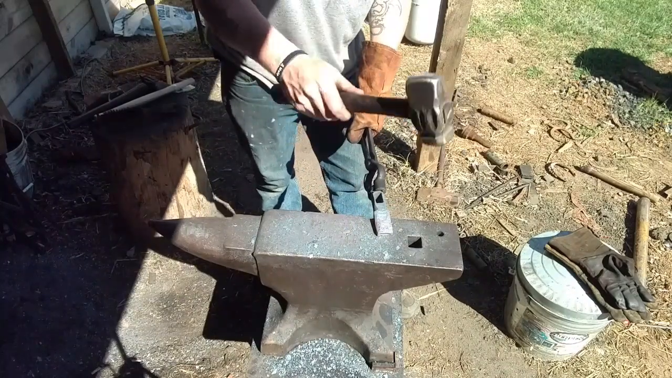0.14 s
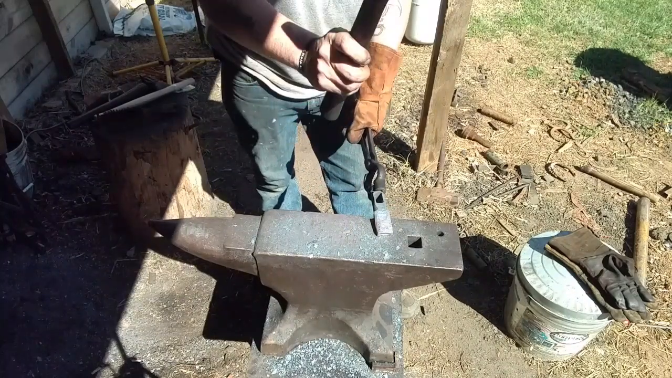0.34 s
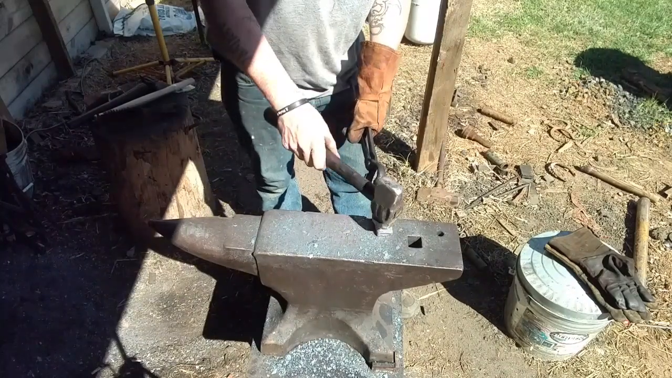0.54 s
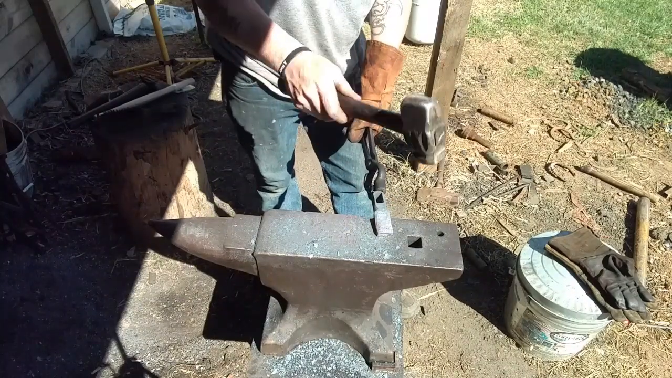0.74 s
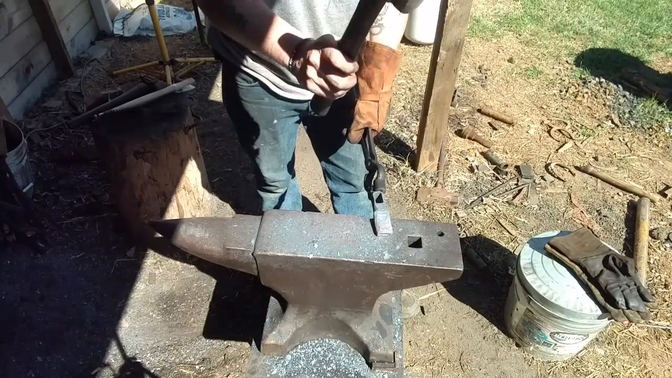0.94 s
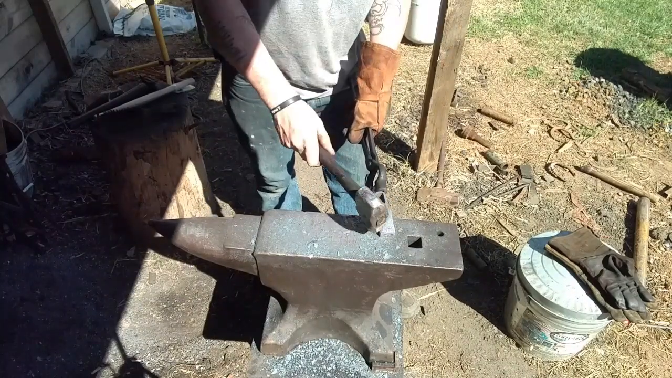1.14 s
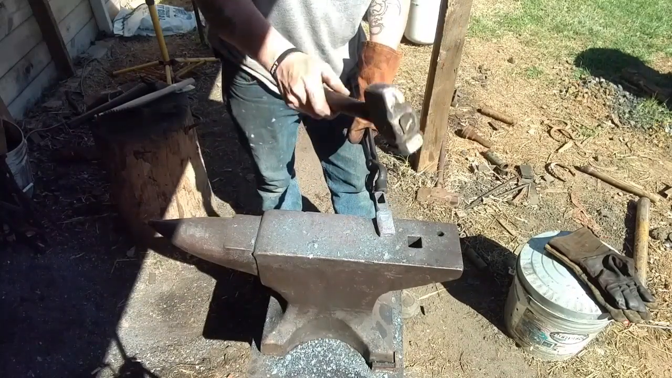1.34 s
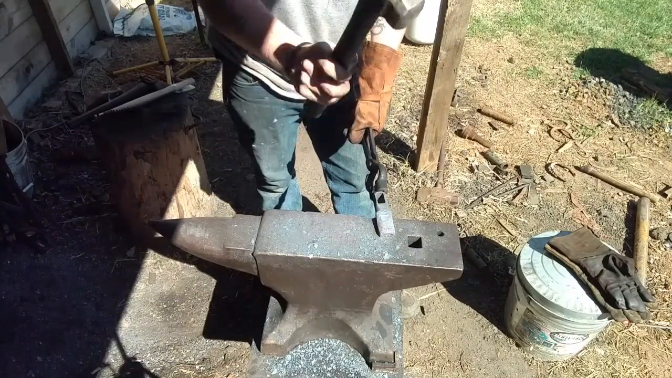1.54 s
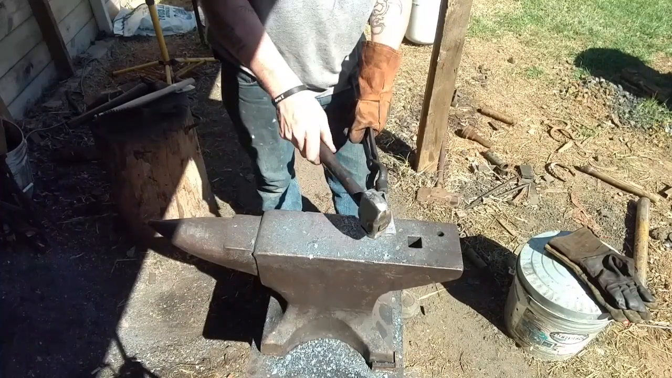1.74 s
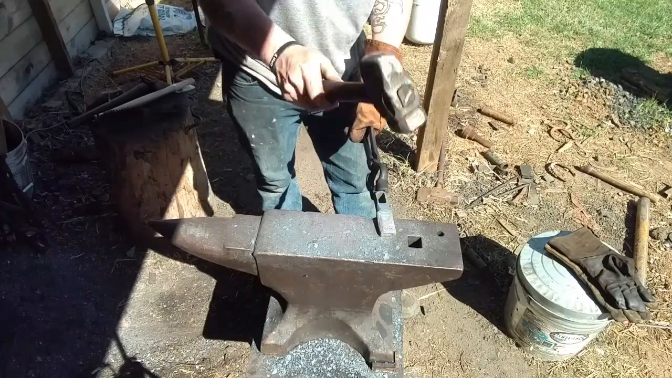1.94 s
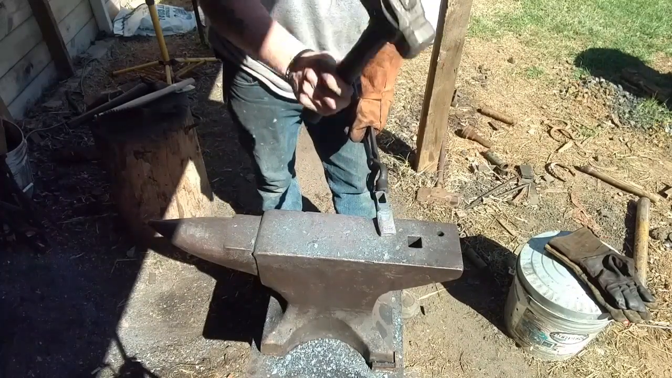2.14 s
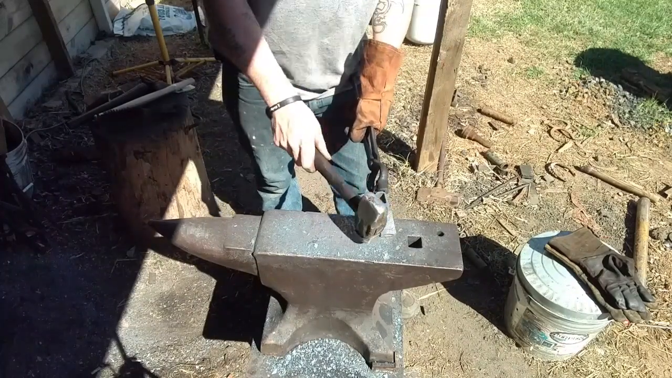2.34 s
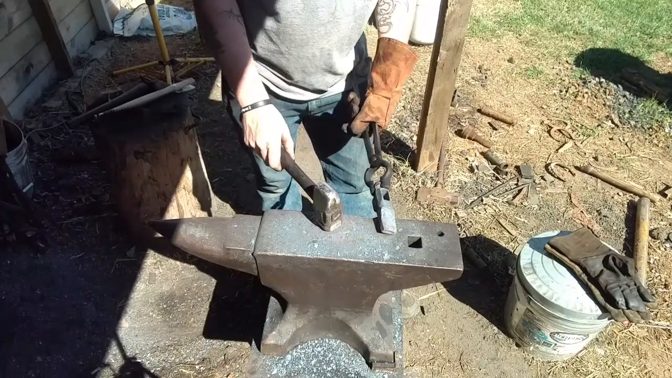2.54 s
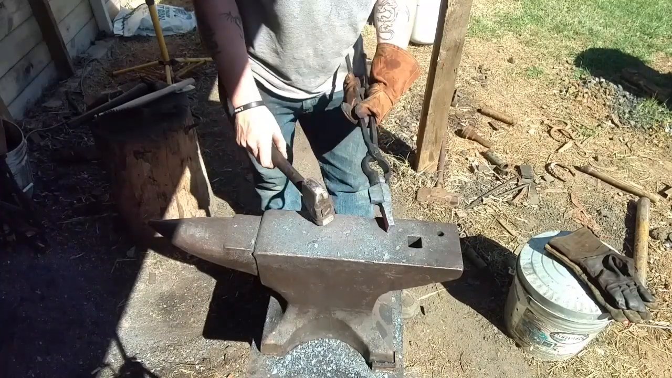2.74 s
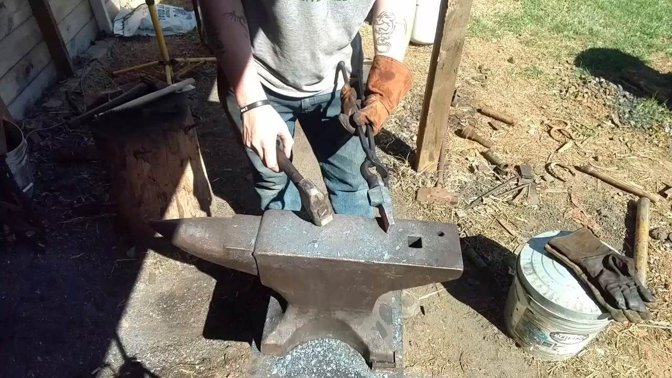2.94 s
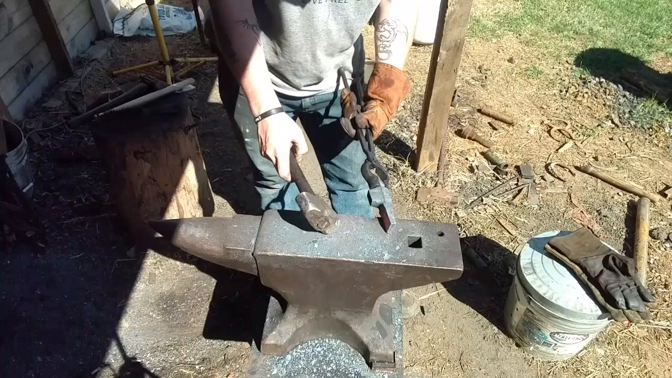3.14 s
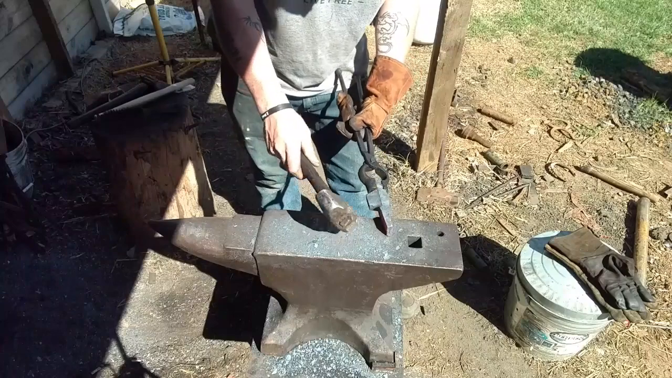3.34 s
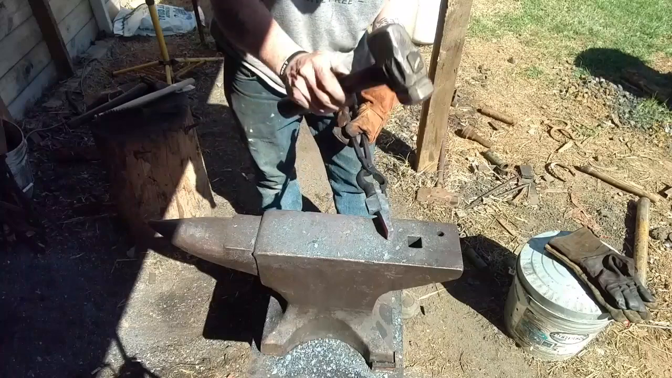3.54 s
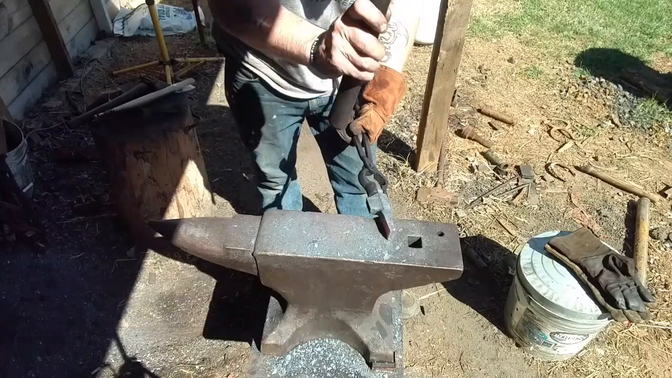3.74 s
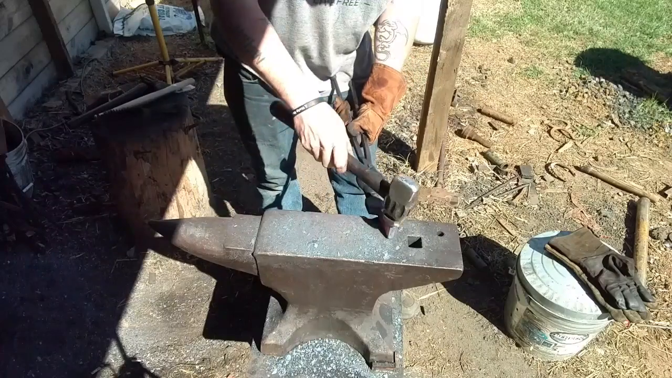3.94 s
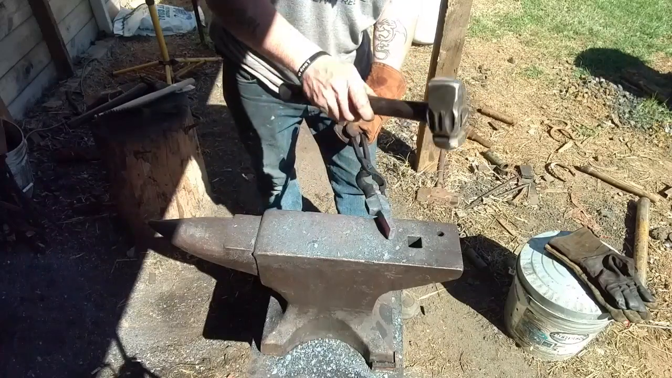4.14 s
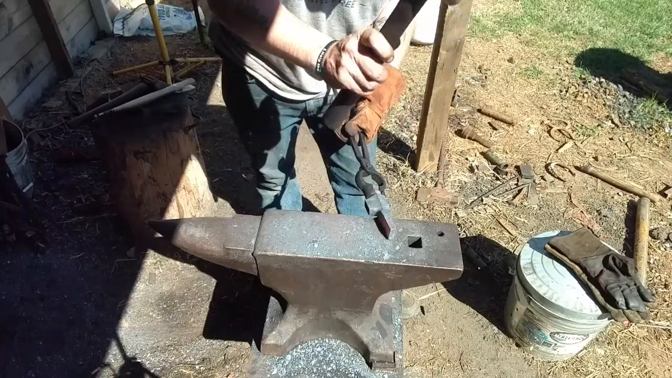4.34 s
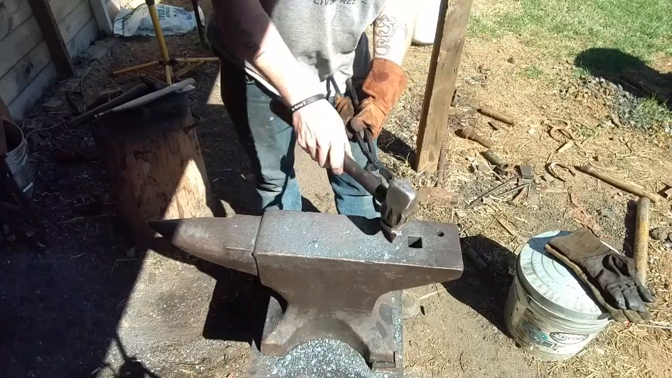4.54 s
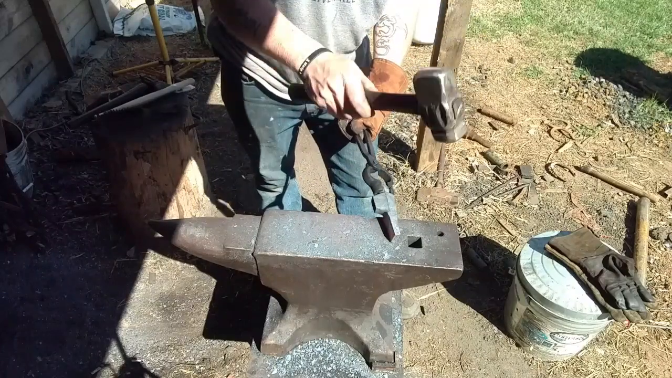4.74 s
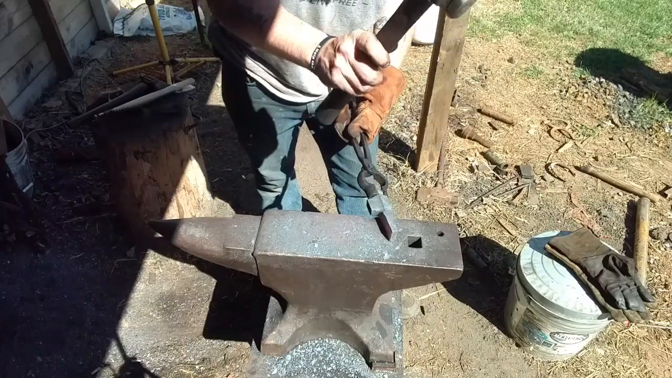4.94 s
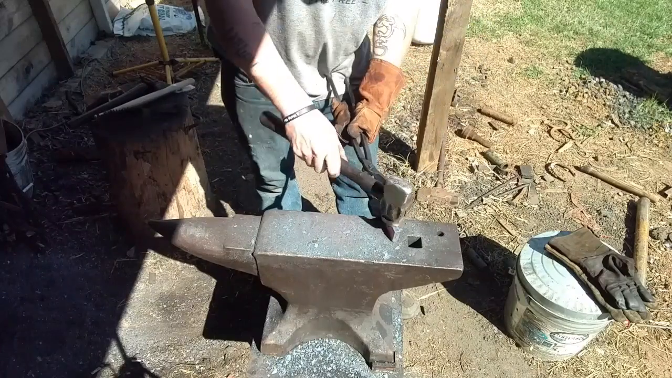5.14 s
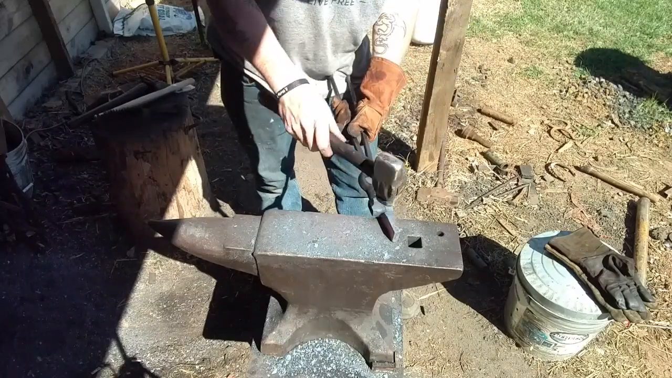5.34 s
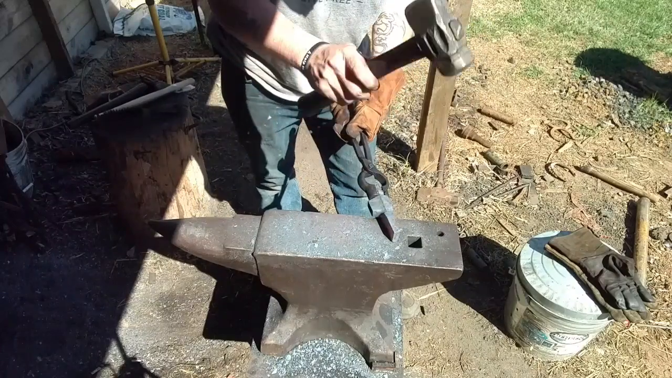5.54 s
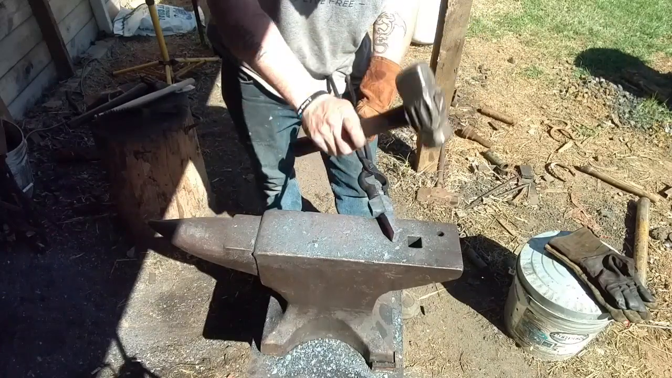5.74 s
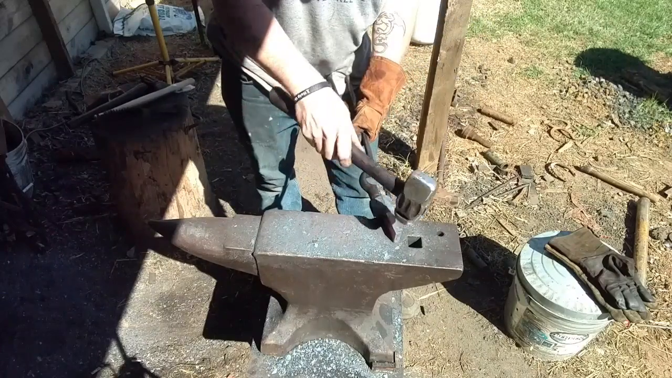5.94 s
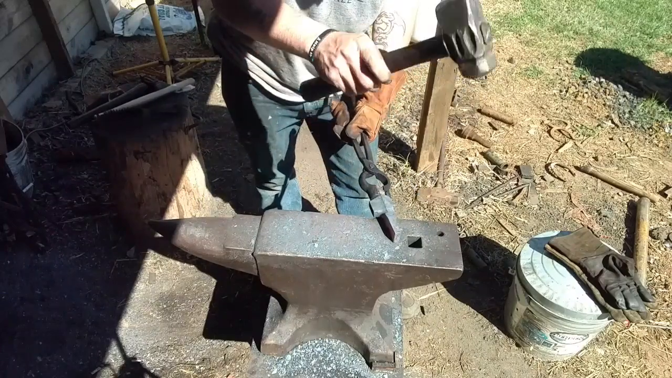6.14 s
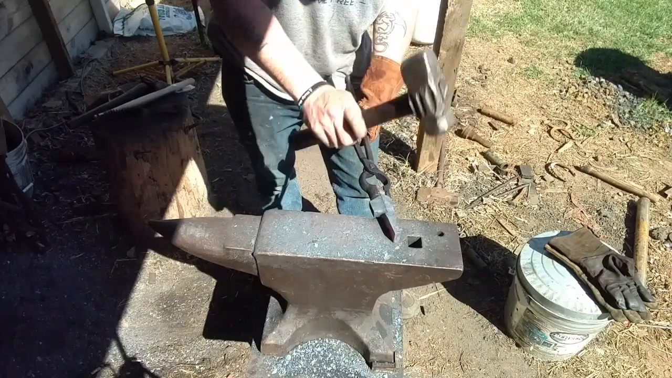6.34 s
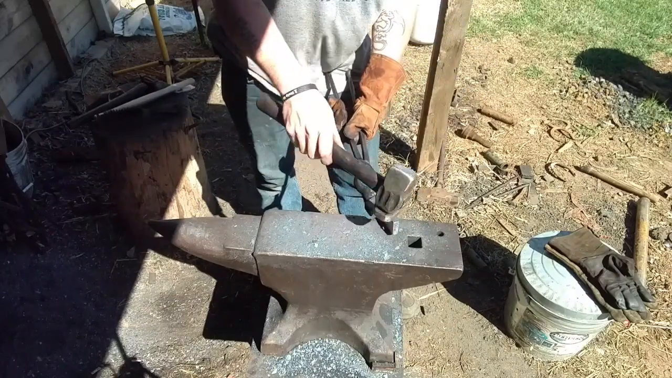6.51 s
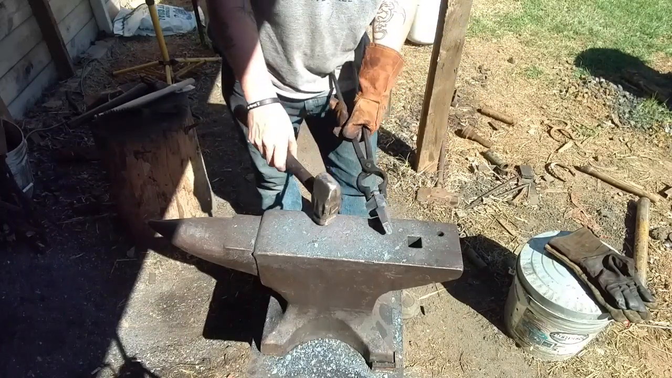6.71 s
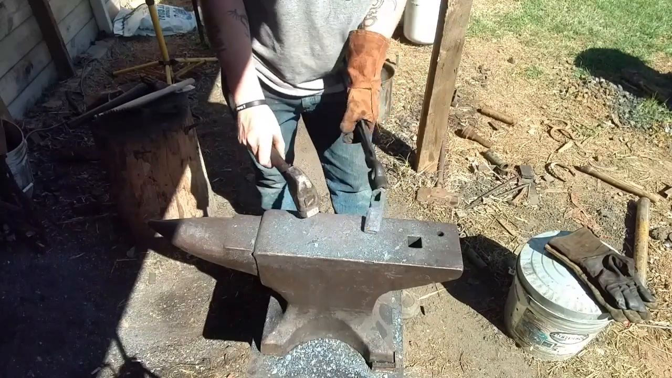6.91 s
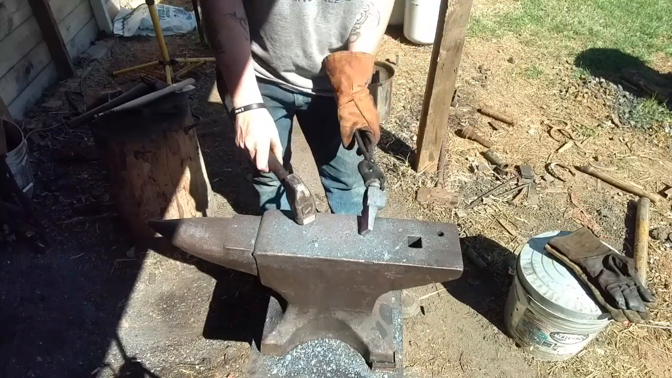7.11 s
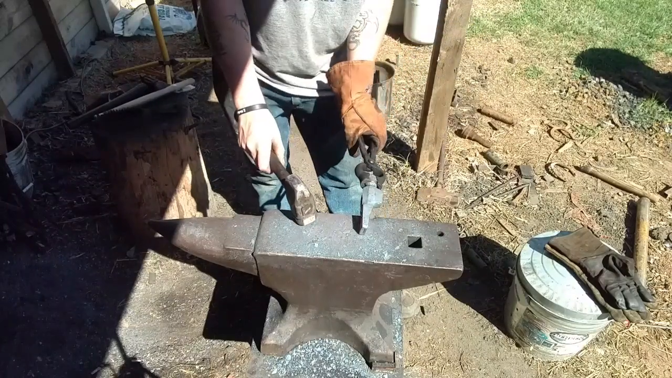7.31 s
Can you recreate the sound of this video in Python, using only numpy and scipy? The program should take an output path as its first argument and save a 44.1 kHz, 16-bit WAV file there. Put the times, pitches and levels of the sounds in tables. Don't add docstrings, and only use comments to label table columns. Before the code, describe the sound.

A hand hammer strikes steel on an anvil in steady heavy blows, dull knock and short ring, with two rattling hammer bounces, outdoors.

```python
import sys
import numpy as np
from scipy import signal
from scipy.fft import rfft, irfft, next_fast_len
from scipy.io import wavfile
from scipy.ndimage import uniform_filter1d

SR = 44100
rng = np.random.default_rng(int(sys.argv[2]) if len(sys.argv) > 2 else 0)


def int16_out(signal):
    q = np.round(np.clip(np.atleast_2d(signal).T, -1, 1) * 32767)
    wavfile.write(sys.argv[1], SR, q.astype(np.int16))


def volts(x):
    e = np.asarray(x, float) / 20
    return 10 ** e


N = 325017
LENGTH = SR * 7 // 10
AGE = np.arange(LENGTH) / SR

# t/s, peak level/dB, then against it scale and tongs level/dB, waist ring level/dB;
# camera gain left after it/dB
BLOWS = [
    (-.05, -7, -21, -21, -0.5),
    (0.537, -2, -14, -19.5, 0.5),
    (1.136, -1, -16.5, -21.5, 0),
    (1.712, -2.5, -16.5, -19.5, 0),
    (2.296, -2.5, -16, -17, 0),
    (3.927, -0.5, -16, -14, 4.5),
    (4.513, -0.5, -16, -33, 0),
    (5.133, -2.5, -14.5, -17, 3),
    (5.833, 0, -19, -19.5, 4),
    (6.435, -1.5, -14, -37, 3.5),
]
# t60/s, level struck at the heel/dB, level struck mid face/dB,
# left minus right level/dB
ANVIL = [(0.081, -4, -2.5, 0.5), (0.069, -17, -39, 1.5), (0.13, -5, -5, -6.5), (0.074, 2, 0.5, -1),
         (0.17, -6, -42, -1), (0.06, 2, -39, -1.5), (0.25, -6.5, -34, 1), (0.25, 1.5, -6, 0),
         (0.2, -18.5, 7, 0.5), (.19, -3, -20, 8.5), (0.13, -10.5, -2.5, -9.5), (0.21, 0.5, -0.5, -2),
         (0.65, -20, -10.5, -10.5), (0.1, -4.5, -3.5, -8.5), (0.38, -11.5, -8.5, 1),
         (0.11, -26.5, -2.5, 5.5), (0.72, -29, -22, 1), (0.3, -24, -19, 0.5), (0.11, -15.5, -5, -3),
         (0.4, -30, -24.5, -0.5), (0.13, -8, -27, 3), (0.089, -26, -37, -3.5), (0.17, -28, -45, -3.5),
         (1, -40.5, -47, 6.5), (0.17, -26.5, -24, -3), (0.51, -33, -35, 1), (0.13, -34, -43, -1),
         (.24, -23, -26, 2), (0.42, -46, -54, 0), (0.36, -31.5, -43, -2)]
# delay t/s, level/dB
ECHOES = [(.0016, -7), (.0040, -5), (.0062, -11), (.0084, -8), (.0125, -13), (.019, -12)]
ECHO_DB = -4.5
# f/Hz, density level/dB per Hz
KNOCK = [(120, -37), (250, -17.5), (450, -9), (620, -12.5), (800, -6), (1150, -2), (1550, 6.5), (1700, -7),
         (2100, -1), (2500, -10), (3000, -41)]


def colour(x, table, turn=0):
    size = next_fast_len(x.shape[-1] + 512)
    hz = np.fft.rfftfreq(size, 1 / SR)
    f, db = np.transpose(table)
    gain = volts(np.interp(np.log(hz + 1), np.log(f), db))
    phase = turn(hz) if turn else 0
    return irfft(rfft(x, size) * gain * np.exp(1j * phase), size)[..., :x.shape[-1]]


def causal(table, skirt_db=12):
    f, db = np.transpose(table)
    hz = np.fft.rfftfreq(4096, 1 / SR)
    level_db = np.interp(np.log(hz + 1), np.log(f), db, left=db[0] - skirt_db, right=db[-1] - skirt_db)
    cepstrum = irfft(np.log(volts(level_db)))
    cepstrum[1:len(hz) - 1] *= 2
    cepstrum[len(hz):] = 0
    return irfft(np.exp(rfft(cepstrum)))


def unit(x):
    return x / np.sqrt(np.mean(x ** 2))


def peak(x):
    return x / np.abs(x[..., :SR // 50]).max()


def fade(t60):
    return np.exp(-np.log(1000) * AGE / t60)


def pair(size, unlike):
    mid, side = rng.standard_normal((2, size))
    return mid + unlike * side * np.array([[1], [-1]])


def walk(rate, size):
    k = max(int(SR / rate), 1)
    return uniform_filter1d(np.repeat(rng.standard_normal(size // k + 1), k), k)[:size]


def camera_gain_db():
    hold_s, recover_db_per_s, duck_s = .25, 11, 0.045
    t = np.arange(N) / SR
    s, left_db = np.transpose(BLOWS)[[0, 4]]
    last = np.searchsorted(s, t) - 1
    recovered_db = recover_db_per_s * np.maximum(t - s[last] - hold_s, 0)
    return uniform_filter1d(left_db[last] + recovered_db, int(duck_s * SR) + 1)


def yard():
    # f/Hz, density level/dB per Hz
    roar_shape = [(110, -37.5), (180, -9.5), (249, -16.5), (435, -1), (487, -12.5), (608, -2), (673, -15),
                  (744, -5), (900, -5), (973, -10.5), (2600, -21), (3380, -51.5), (5720, -120)]
    rumble_shape = [(20, -43), (45, -23), (70, -6), (120, 1.5), (180, 3), (260, -23.5)]
    hiss_shape = [(1200, -20.5), (2200, 4.5), (3500, -3), (5000, -3), (7000, -3), (9500, -7), (12000, -16),
                  (14900, -25), (15300, -52)]
    # multiple of the blade rate, level above the roar/dB
    blade_orders = [(4, -15.5), (5, -3.5), (6, -3), (7, -13)]
    blade_hz, roar_db, hiss_db, hiss_follows = 153.2, -63, -66.5, 0.88
    gain_db = camera_gain_db()
    roar = unit(colour(pair(N, unlike=0.58), roar_shape)) * volts(2.0 * walk(12, N))
    roar = roar + volts(-12.0) * unit(colour(pair(N, unlike=0.45), rumble_shape))
    turn = 2 * np.pi * np.cumsum(blade_hz * (1 + 0.00298 * walk(2.7, N))) / SR
    for order, db in blade_orders:
        roar = roar + volts(db + 1.1 * walk(9.2, N)) * np.sin(order * turn)
    hiss = unit(colour(pair(N, unlike=0.062), hiss_shape)) * volts(.8 * walk(11, N))
    return roar * volts(roar_db + gain_db) + hiss * volts(hiss_db + hiss_follows * gain_db)


def engine():
    # t/s, f/Hz, rms level/dB
    gears = [
        [(2.75, 108, -79), (3.1, 114, -75), (3.5, 122, -72.5), (3.9, 126, -79)],
        [(4.65, 91, -72), (5.1, 99, -71.5), (5.75, 105, -70), (6.3, 111, -69.5), (6.8, 116, -68),
         (7.37, 120, -71)],
    ]
    t, out = np.arange(N) / SR, 0
    for s, hz, db in map(np.transpose, gears):
        turn = 2 * np.pi * np.cumsum(np.interp(t, s, hz)) / SR
        swell = uniform_filter1d(volts(np.interp(t, s, db, left=-120, right=-120)), SR // 10)
        tone = np.sin(turn + [[1.6], [0]]) + volts(-31.5) * np.sin(turn / 2)
        out = out + swell * volts(2.0 * walk(5.2, N)) * tone
    return out * volts(camera_gain_db())


def shelter(early_db, tail_db, t60):
    shape = (volts(early_db) * fade(0.019) + volts(tail_db) * fade(t60)) * np.minimum(AGE / 0.0015, 1)
    response = shape * pair(LENGTH, unlike=0.12)
    response[:, 0] = 1
    for s, db in ECHOES:
        response[:, int(s * SR)] += volts(db + ECHO_DB)
    return response


def through(response, table):
    push = np.convolve(causal(table), np.hanning(22))
    return peak(signal.fftconvolve(response, push[None])[:, :LENGTH])


def firm(x):
    return signal.sosfilt(signal.butter(2, 90, "high", fs=SR, output="sos"), x)


def shock_db(s):
    gain_db = camera_gain_db()
    before, after = (gain_db[np.clip(int((s + d) * SR), 0, N - 1)] for d in (-.05, .05))
    return 2 * max(before - after, 0)


def crack(table, t60):
    snap = fade(t60) * unit(colour(rng.standard_normal(LENGTH), table))
    return snap + sum(volts(db + ECHO_DB) * np.roll(snap, int(s * SR)) for s, db in ECHOES)


def rattle(table, t60, rise, lumpy_db, jingle_db, count):
    linger_db, linger_stretch = -22.5, 2.1
    decay = fade(t60) + volts(linger_db) * fade(linger_stretch * t60)
    shape = decay * (1 - np.exp(-AGE / rise))
    place, size, phase = rng.random((count, 3)).T[:, :, None]
    hz = table[1][0] + (table[-2][0] - table[1][0]) * place
    age = AGE[:SR // 4]
    jingle = np.sum(volts(35 * size) * np.sin(2 * np.pi * (hz * age + phase)), axis=0)
    jingle = np.pad(unit(jingle), (0, LENGTH - len(age)))
    burst = volts(lumpy_db * walk(500, LENGTH)) * pair(LENGTH, unlike=0.61)
    return shape * unit(colour(burst + volts(jingle_db) * jingle, table))


def hits(table, modes_db, knock, thud, ground, scatter_db):
    mode_hz = [306, 485, 731, 889, 967, 1036, 1181, 1334, 1428, 1462, 1545, 1880, 1896, 2138, 2473, 2708,
               2904, 3344, 3430, 3611, 3731, 3900, 4250, 4537, 4914, 5958, 6310, 6562, 8162, 9421]
    # f/Hz, density level/dB per Hz
    clatter_shape = [(2000, -17), (2700, -1), (3600, -1.5), (4600, -5), (5500, -9.5), (7000, -46)]
    sizzle_shape = [(4000, -25.5), (5500, 3), (7000, -1.5), (10000, -4), (12500, -8.5), (15300, -20.5),
                    (16200, -33.5)]
    hz = np.array(mode_hz)
    t60, left_db = np.transpose(ANVIL)[[0, 3]]
    rings = np.sin(2 * np.pi * hz[:, None] * AGE) * fade(np.minimum(t60[:, None], 1.5))
    ears = volts(np.array([left_db, -left_db]) / 2)
    waist = (hz > 1300) & (hz < 1450)
    heel = (hz > 1800) & (hz < 2500)
    direct = through((AGE == 0)[None] * 1., KNOCK)
    out = np.zeros((2, N + 2 * LENGTH))
    for s, peak_db, clatter_db, sizzle_db, waist_db, heel_db in table:
        spot_db = np.where(waist, waist_db, np.where(heel, heel_db, -17))
        spread_db = scatter_db * (.2 + np.minimum(hz / 3000, 1) ** 2)
        spot_db = spot_db + modes_db + spread_db * rng.standard_normal(len(hz))
        ring = volts(spot_db) * ears @ rings * np.minimum(AGE / 0.0021, 1)

        own = through(shelter(early_db=-10.5, tail_db=-30.5, t60=0.16), KNOCK)
        body = knock + volts(-6.5) * direct + volts(-5) * own
        body = body + volts(1.7 * rng.standard_normal()) * thud
        sound = firm(body) + volts(shock_db(s)) * ground + ring

        tongs = rattle(clatter_shape, t60=0.1, rise=0.0025, lumpy_db=6.5, jingle_db=-6.0, count=24)
        sound += volts(clatter_db) * (tongs + volts(2.5) * crack(clatter_shape, t60=0.0067))
        scale = rattle(sizzle_shape, t60=0.074, rise=0.0041, lumpy_db=5.0, jingle_db=2.0, count=30)
        sound += volts(sizzle_db) * (scale + volts(3.5) * crack(sizzle_shape, t60=0.0081))

        start = int((s + .0011) * SR) + LENGTH
        out[:, start:start + LENGTH] += volts(peak_db - 3) * sound
    return out[:, LENGTH:LENGTH + N]


def anvil():
    # t/s, peak level/dB, then against it clatter level/dB, heel ring level/dB
    bounce_hits = [(2.439, -22, -11.5, -12), (2.533, -21, -15.5, -14), (2.587, -23, -15.5, -9.5),
                   (2.625, -26.5, -34, -20), (2.654, -33.5, -36, -29), (2.684, -44, -32, -25),
                   (6.759, -6.5, -13, -12), (6.89, -7.5, -9.5, -9.5), (6.999, -10.5, -9.5, -8.5),
                   (7.076, -13, -16.5, -14), (7.126, -17.5, -23, -11.5), (7.159, -21, -30, -30),
                   (7.185, -31, -31, -9)]
    # peak level/dB, then against it clatter, sizzle, waist and heel level/dB
    tick_db = (-48.5, -5.5, -6, -14, -9)
    # f/Hz, density level/dB per Hz
    thud_shape = [(120, -46), (195, -16), (245, 2.5), (320, -6), (400, -5), (500, -8.5), (620, -12.5)]
    ground_shape = [(20, -15.5), (40, -4.5), (80, 2.5), (130, 16), (200, -27.5)]
    tick_s, rests_s = 4.911, 7.2
    room = shelter(early_db=-10.0, tail_db=-22.5, t60=0.15)
    knock, thud = through(room, KNOCK), through(room, thud_shape)
    ground = through(room, ground_shape) * [[-.8], [1]]
    heel_modes_db, face_modes_db = np.transpose(ANVIL)[1:3]
    hot = [(s, db, scale_db, scale_db + 1, waist_db, -18.5 - 1.5 * max(db, -4))
           for s, db, scale_db, waist_db, _ in BLOWS]
    cold = [(s, db, clatter_db, clatter_db - 18.5, -19 - 0.1946 * db, ring_db)
            for s, db, clatter_db, ring_db in bounce_hits]
    cold = sorted(cold + [(tick_s, *tick_db)])
    blows = hits(hot, heel_modes_db, knock, volts(-27) * thud, volts(-48) * ground, scatter_db=3.0)
    bounces = hits(cold, face_modes_db, knock, volts(-24) * thud, volts(-49) * ground, scatter_db=-2.0)
    resting = np.maximum(np.arange(N) / SR - rests_s, 0)
    return blows + bounces * volts(-60 * resting / 0.66)


def lean(x, table):
    out = []
    for v, side in zip(x, (1, -1)):
        response = causal([(f, side * db / 2) for f, db in table], skirt_db=0)
        out.append(signal.fftconvolve(v, response)[:N])
    return np.array(out)


def scene():
    # f/Hz, left minus right level/dB
    forge_side = [(60, -3), (200, -3.5), (380, -4.5), (700, -2.5), (1290, -1), (2400, -1), (8000, -.5),
                  (15000, -1)]
    yard_side = [(60, -6.5), (110, 3.5), (200, -10), (380, -10.5), (700, -10), (1290, -0.5), (2380, -3),
                 (4400, -8.5), (8120, 0.5), (15000, -8)]
    return lean(yard() + engine(), yard_side) + lean(anvil(), forge_side)


def low_pass(x):
    return signal.sosfilt(signal.butter(12, 16480, fs=SR, output="sos"), x)


def record(dry):
    notch_hz = 2575

    def left_phase(hz):
        treble = (hz - 1285 + np.hypot(hz - 1285, 200)) / 2
        bump = .75 * np.exp(-((hz - 1750) / 550) ** 2)
        return bump - 2 * np.pi * treble / notch_hz

    left = colour(dry[0], [(1, 0.0047), (2, 0.032)], left_phase)
    clipped = np.clip(np.array([left, dry[1]]), -.97, .97)
    top = signal.ellip(5, .3, 30, 15700, fs=SR, output="sos")
    return low_pass(signal.sosfilt(top, clipped))


dry = scene()
out = record(dry)
int16_out(out)
```